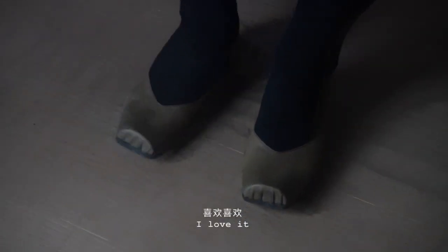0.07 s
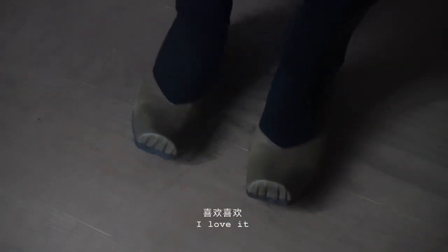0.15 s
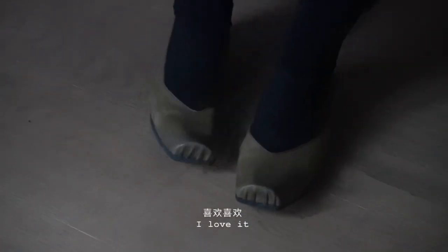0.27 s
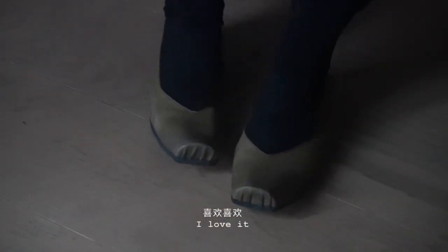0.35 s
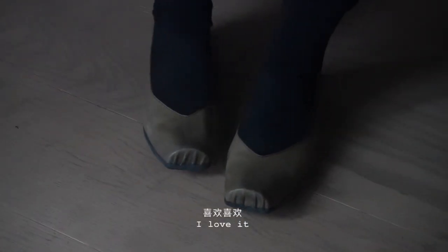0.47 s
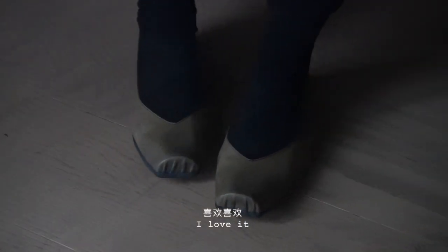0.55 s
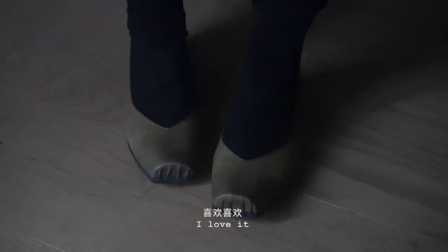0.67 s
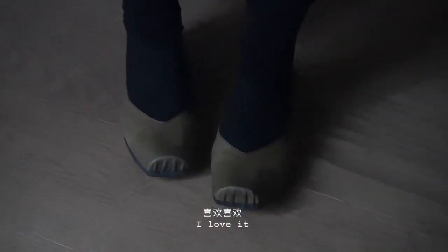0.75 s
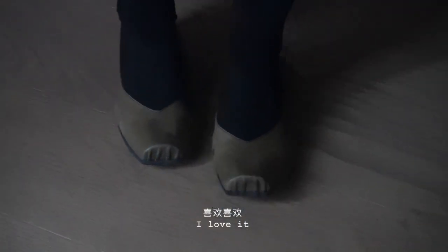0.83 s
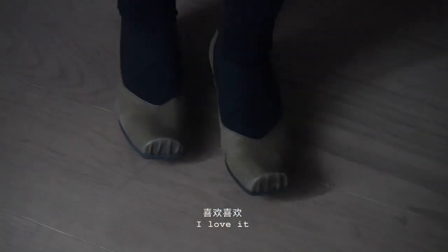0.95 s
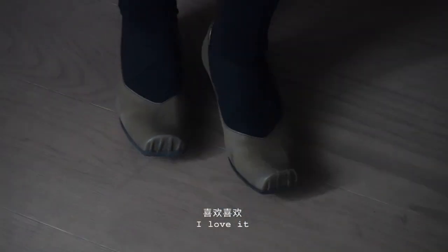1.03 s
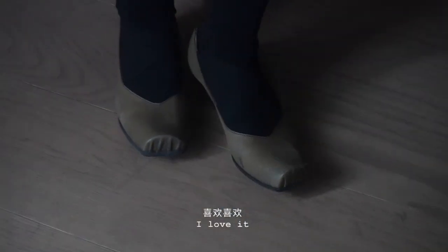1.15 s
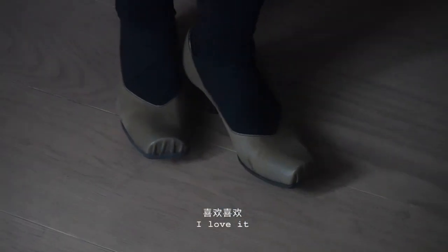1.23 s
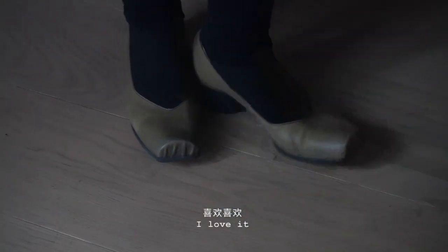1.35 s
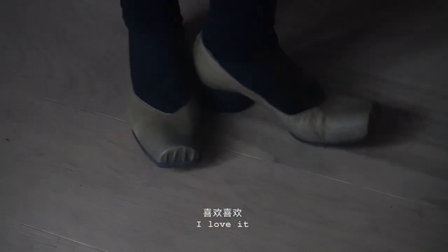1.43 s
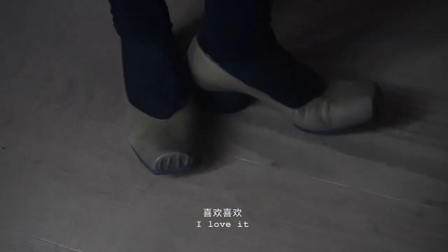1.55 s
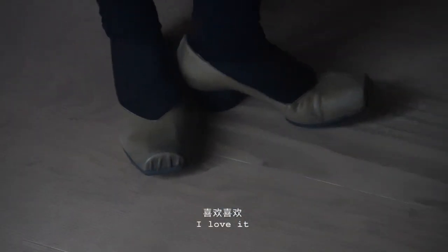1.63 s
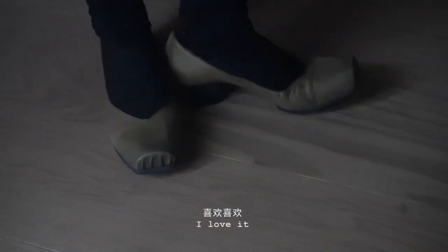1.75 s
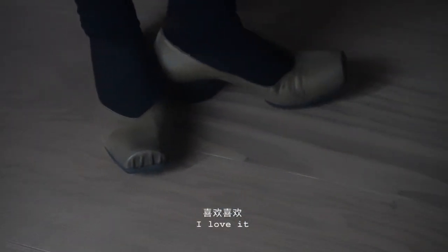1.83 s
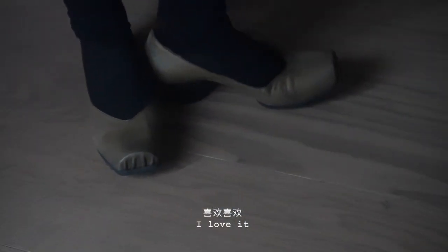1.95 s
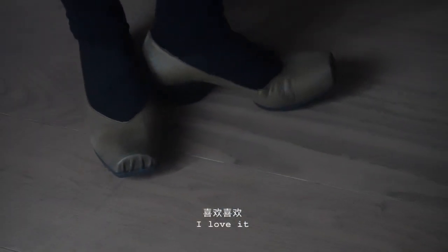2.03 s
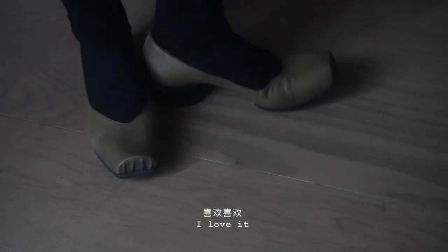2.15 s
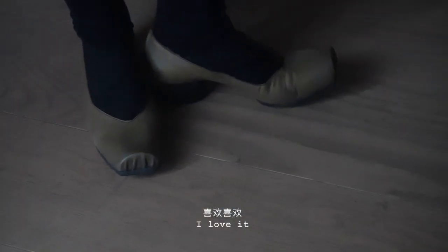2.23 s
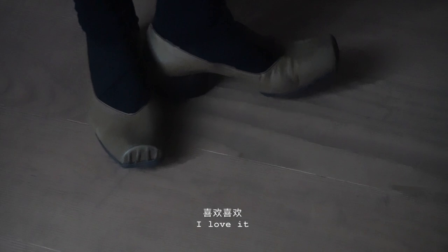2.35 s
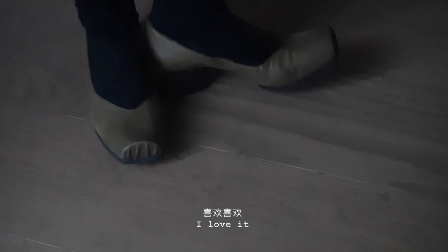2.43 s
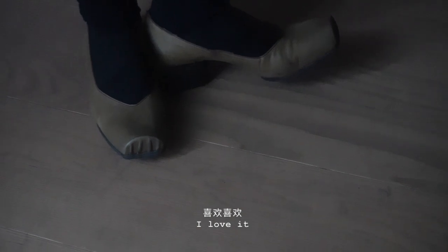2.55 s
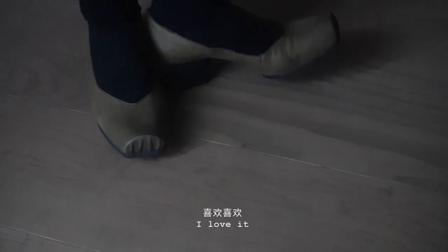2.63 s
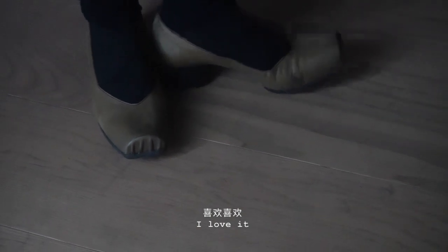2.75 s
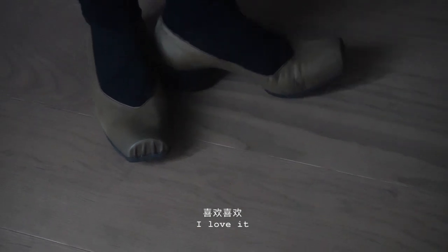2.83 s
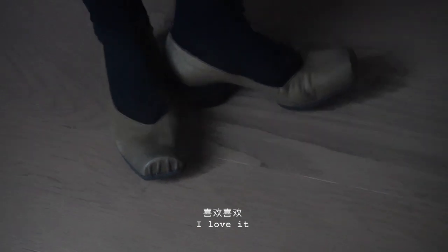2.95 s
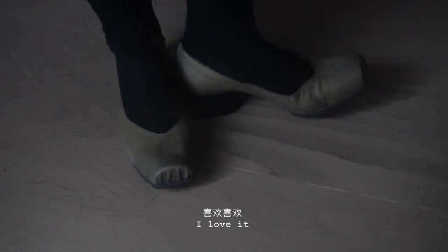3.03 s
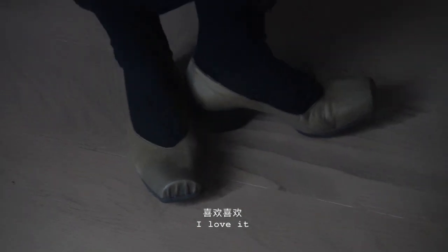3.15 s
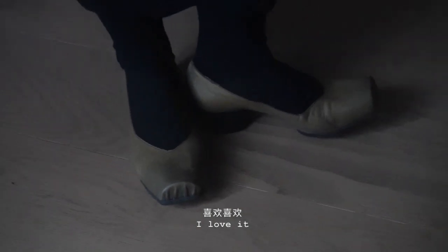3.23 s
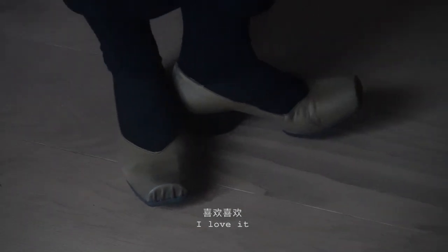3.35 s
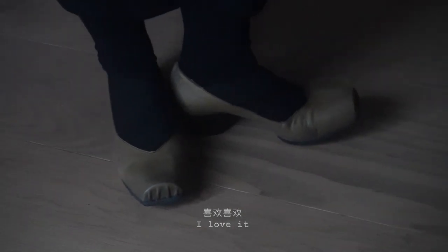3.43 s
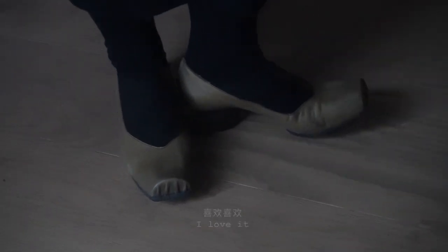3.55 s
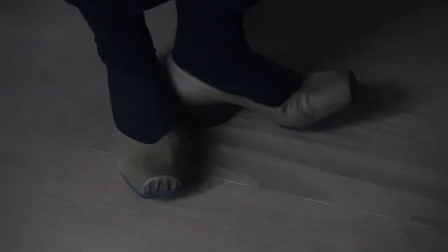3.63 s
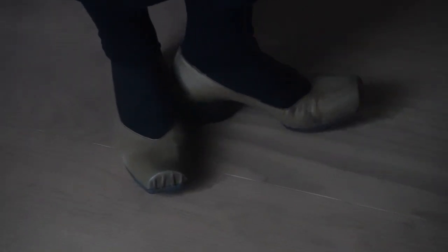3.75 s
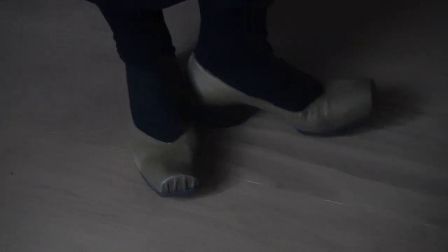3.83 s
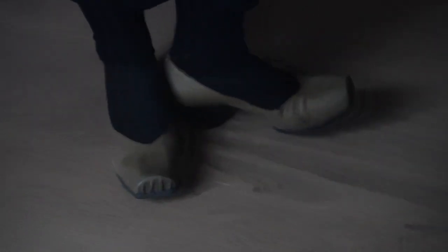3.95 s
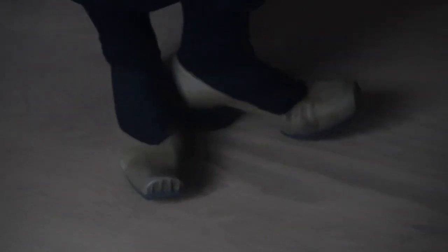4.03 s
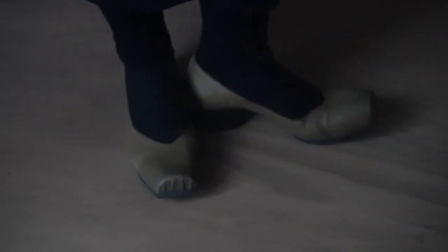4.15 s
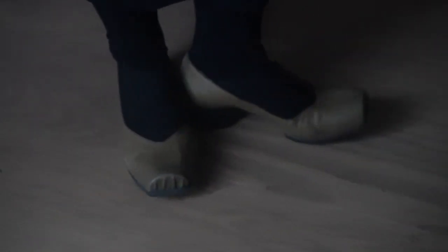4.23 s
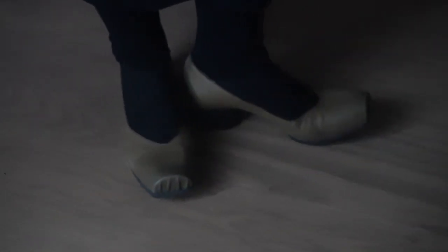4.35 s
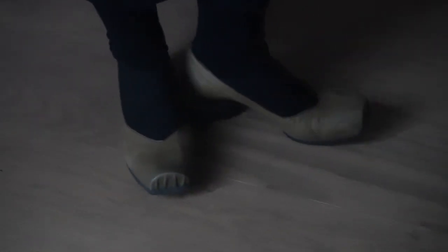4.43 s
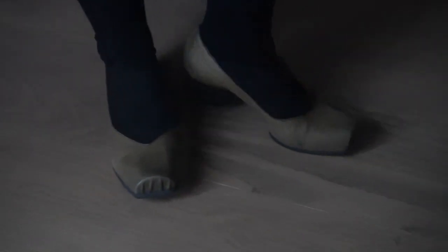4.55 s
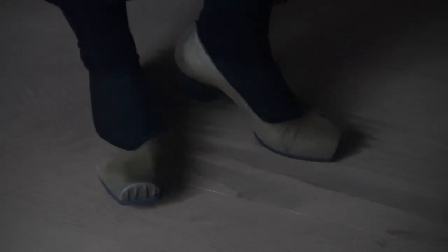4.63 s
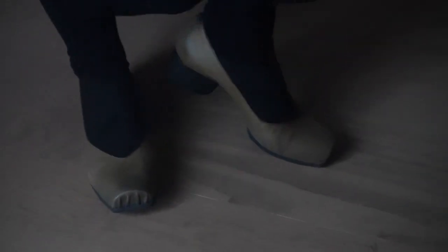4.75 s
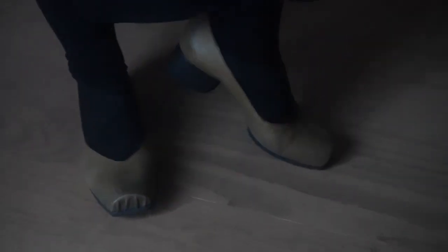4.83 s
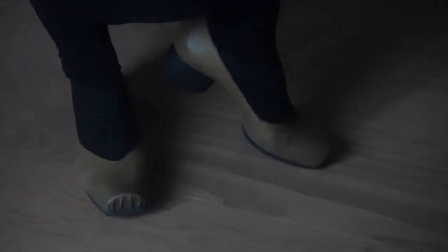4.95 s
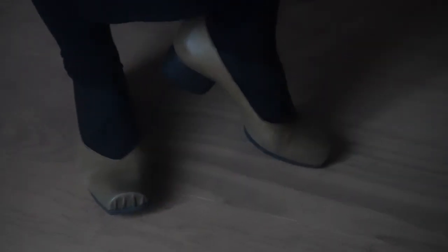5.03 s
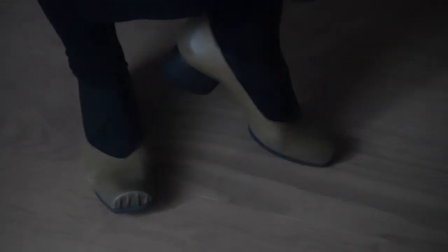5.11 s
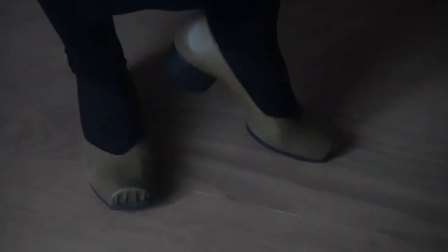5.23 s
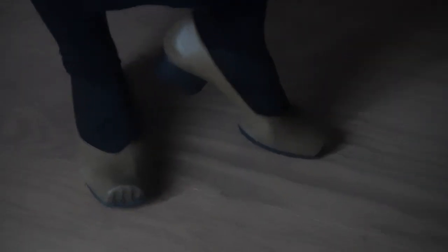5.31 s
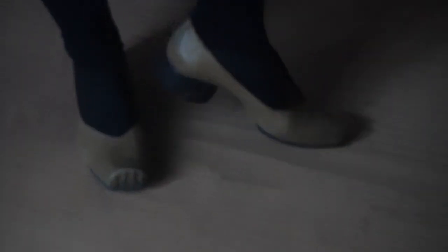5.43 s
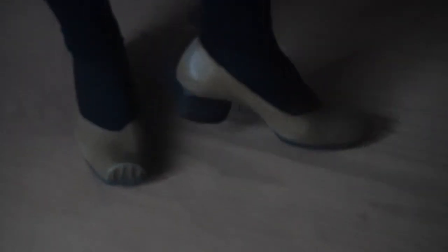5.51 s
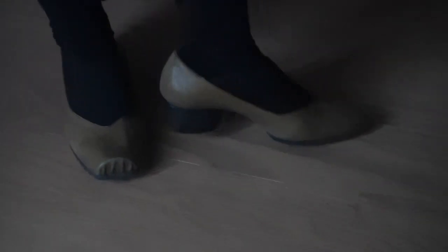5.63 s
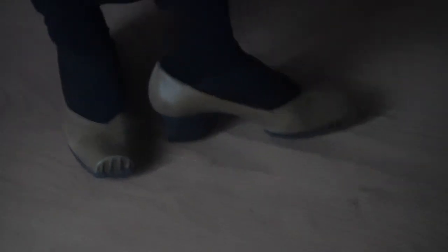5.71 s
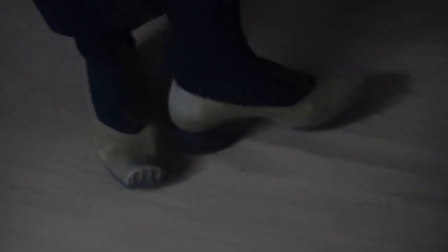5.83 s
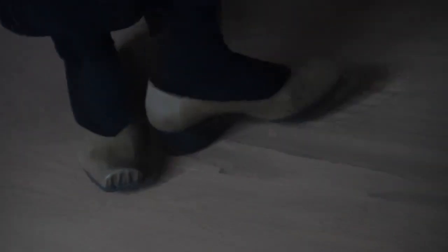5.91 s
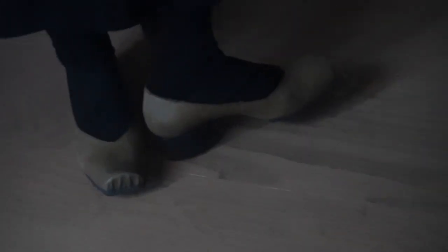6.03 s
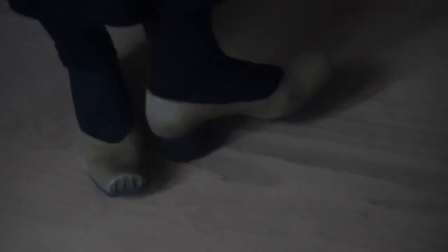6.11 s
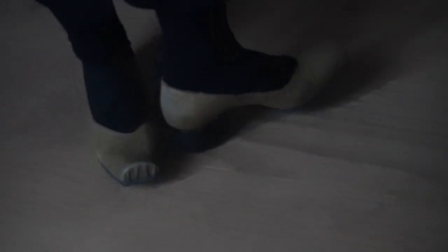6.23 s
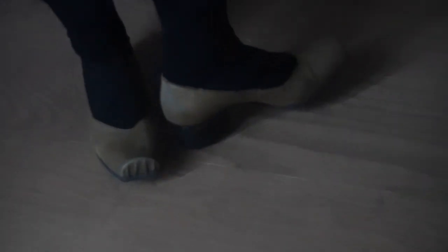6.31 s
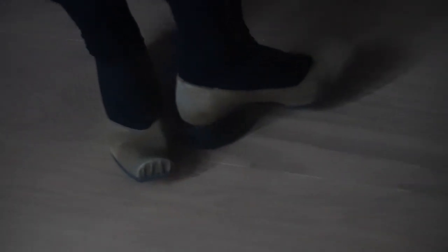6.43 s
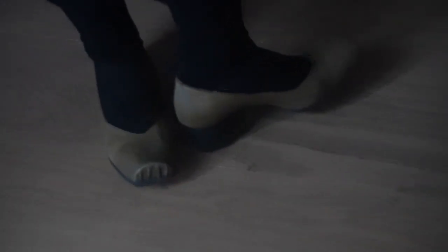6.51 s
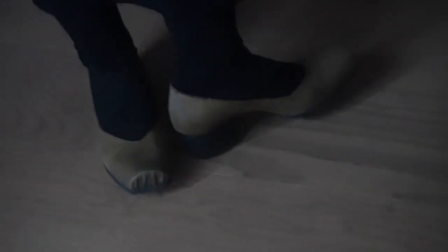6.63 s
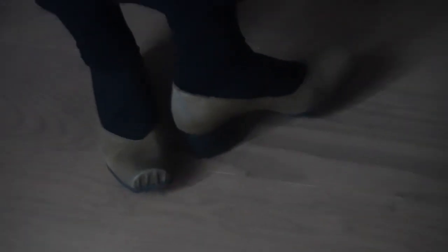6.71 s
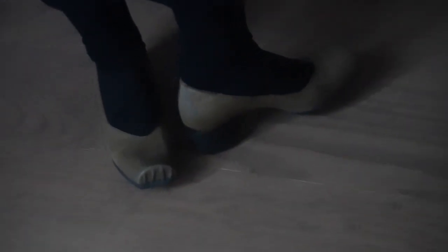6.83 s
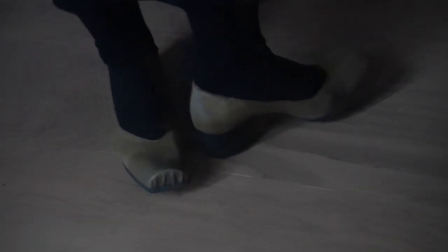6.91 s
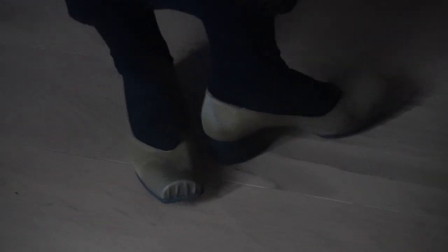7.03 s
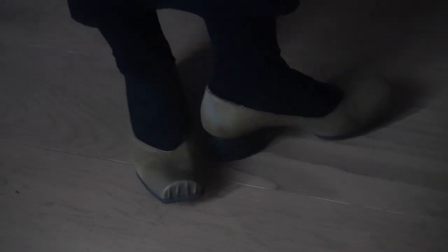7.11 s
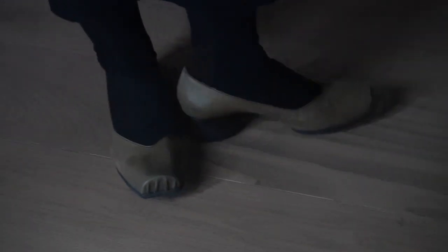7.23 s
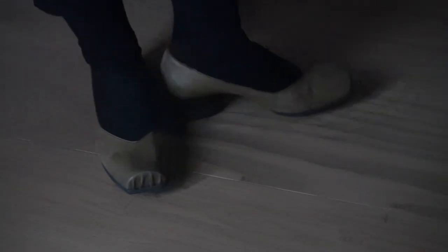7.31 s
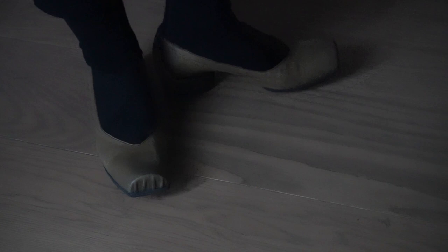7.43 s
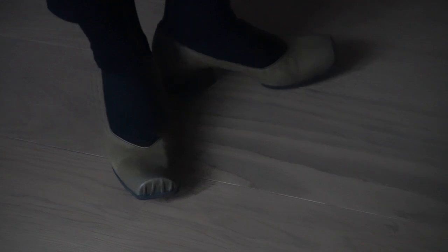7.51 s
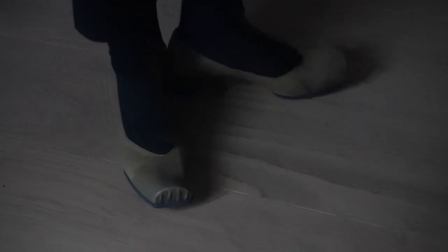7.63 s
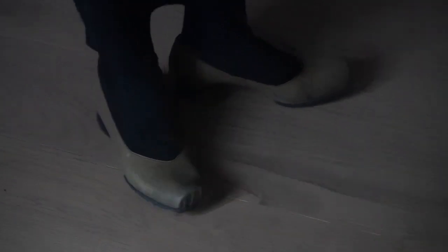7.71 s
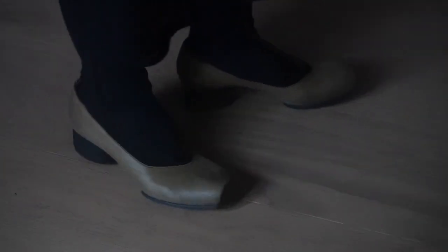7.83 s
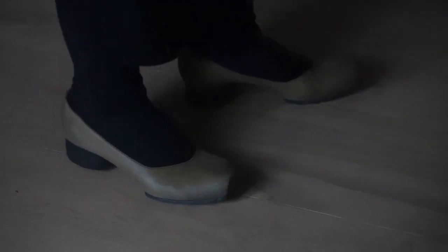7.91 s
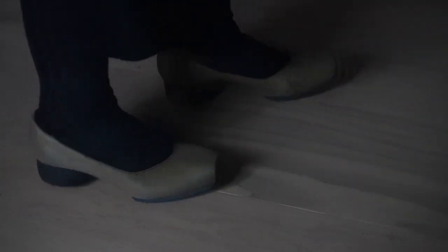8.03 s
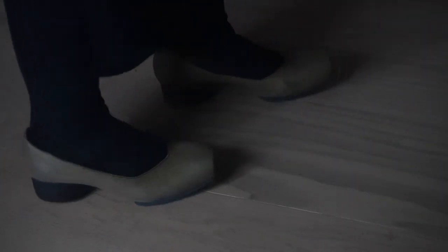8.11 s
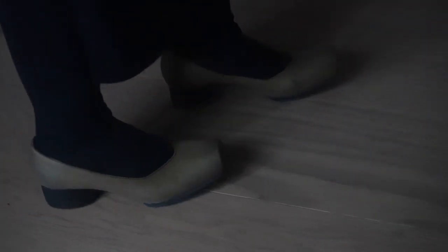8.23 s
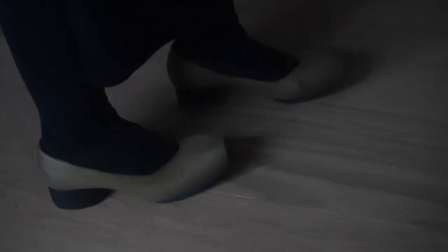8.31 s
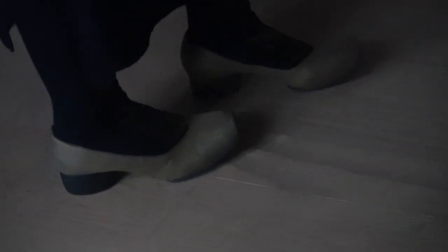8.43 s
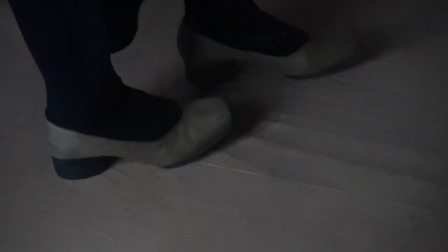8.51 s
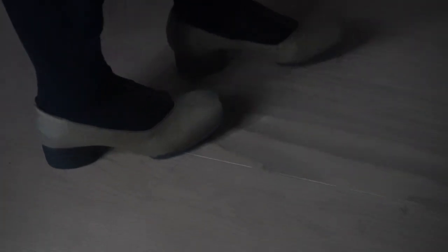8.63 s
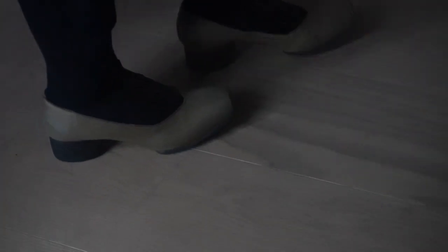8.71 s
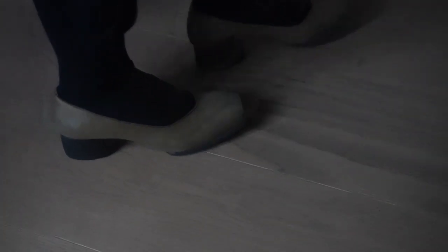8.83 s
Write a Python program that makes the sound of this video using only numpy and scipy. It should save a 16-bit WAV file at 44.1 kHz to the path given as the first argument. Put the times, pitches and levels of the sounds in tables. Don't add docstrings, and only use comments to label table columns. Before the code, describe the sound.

Low-heeled shoes scuff and squeak on a wooden floor, tap five times evenly, drop a hard heel, then scuff again and land one firm step.

```python
import sys
import numpy as np
from scipy import signal
from scipy.io import wavfile

SR = 44100
rng = np.random.default_rng(int(sys.argv[2]) if len(sys.argv) > 2 else 0)


def how_loud(loudness_db):
    steps = np.asarray(loudness_db, float) / 20
    return 10 ** steps


def waveform_to_disk(signal):
    frames = np.transpose(np.atleast_2d(signal))
    scaled = np.clip(frames, -1, 1) * 32767
    samples = np.round(scaled).astype(np.int16)
    wavfile.write(sys.argv[1], SR, samples)


N = 390726


def unit_rms(x):
    return x / np.sqrt(np.mean(x ** 2) + 1e-20)


def at_hz(points, hz, column=1):
    points = np.array(points)
    return np.interp(np.log(hz), np.log(points[:, 0]), points[:, column])


def band(x, low_hz, high_hz):
    return signal.sosfilt(signal.butter(2, [low_hz, high_hz], "band", fs=SR, output="sos"), x)


def half_octaves():
    edges = 22 * 2 ** np.arange(0, 9.6, .5)
    return zip(edges, edges[1:], np.sqrt(edges[:-1] * edges[1:]))


def drift(rate_hz):
    r = np.exp(-80 * np.pi * rate_hz / SR)
    chance = rng.standard_normal(N // 40 + 2002)
    slow = signal.lfilter([1], [1, -2 * r, r * r], chance)[2000:]
    return np.interp(np.arange(N) / 40, np.arange(len(slow)), unit_rms(slow))


def ring(force, hz, t60_s):
    r, w = how_loud(-60 / (t60_s * SR)), 2 * np.pi * hz / SR
    return signal.lfilter([0, np.sin(w)], [1, -2 * r * np.cos(w), r * r], force)


def resonate(x, peaks):
    out = 0
    for k, (hz, width_hz, db) in enumerate(peaks):
        r = np.exp(-np.pi * width_hz / SR)
        top = how_loud(db) * (-1) ** k * (1 - r * r) / 2
        out = out + signal.lfilter([top, 0, -top], [1, -2 * r * np.cos(2 * np.pi * hz / SR), r * r], x)
    return unit_rms(out)


# pitch in Hz, level in dB per Hz.
HUM = [(13, -40), (22, -70), (38, 1.5), (106, -4), (173, -11.5), (345, -16), (480, -17), (535, -19),
       (1950, -29.5), (2640, -28.5), (2870, -31.5), (6370, -35.5), (15800, -39.5)]
# pitch in Hz, likeness from 0 to 1.
HUM_LIKENESS = [(60, 1.0), (180, 0.97), (550, 0.17), (1650, 0.0), (4970, 0.094), (15000, 0.22)]


def hum(patchy_db):
    out, white = 0, rng.standard_normal((2, 2, N))
    for k, (low, high, hz) in enumerate(half_octaves()):
        mid, side = band(white[k % 2], low, high)
        alike = np.clip(at_hz(HUM_LIKENESS, hz), 0, 1)
        gain = how_loud(at_hz(HUM, hz) + patchy_db * drift(5.7))
        out = out + gain * (np.sqrt(1 + alike) * mid + np.sqrt(1 - alike) * side * [[1], [-1]])
    return how_loud(-50) * unit_rms(out)


# fastest moment in seconds, rasp level in dB, swell in seconds,
# fade in seconds, hiss in dB above the rasp.
SCUFFS = [(.045, -43, 0.25, 0.081, -8), (.19, -47, 0.022, .1, -12), (.13, -55, 0.091, .15, -5),
          (.275, -41, 0.086, 0.11, -6), (.4, -60.5, .1, .3, -1.5), (.87, -48.5, 0.15, 0.14, -9.5),
          (.99, -46, 0.18, .25, -8.5), (1.16, -43.5, 0.082, .1, -9.5), (1.44, -42, 0.07, 0.1, -10),
          (1.52, -52.5, .08, 0.22, -8), (1.79, -54, .2, 0.14, -6.5), (4.472, -46, 0.068, 0.044, -5.5),
          (7.36, -47, 0.14, 0.074, -6), (7.442, -41.5, 0.0047, 0.056, 0), (7.48, -46, 0.048, 0.16, -5),
          (7.71, -45.5, 0.066, 0.073, -8), (7.754, -38.5, 0.046, 0.023, -8), (7.79, -54.5, 0.046, 0.25, -1)]
SKIMS = [
    (4.65, -67.5, 0.22, 0.37, 6.5),
    (4.9, -79.5, .3, .2, 15),
    (5.47, -49, 0.073, .1, -2.5),
    (5.52, -46.5, .1, 0.091, -6.5),
    (5.64, -64, 0.084, 0.6, -2.5),
    (8.0, -61.5, 0.24, 0.37, -0.5),
    (8.4, -56, 0.11, 0.12, -2),
]
SWIPES = [
    (1.25, -47, 0.15, 0.037, -6.5),
    (1.34, -44, .035, .1, -10.5),
    (1.39, -42.5, 0.16, 0.18, -11),
    (5.795, -44, 0.016, 0.11, -12.5),
    (7.0, -48.5, 0.013, 0.13, -14),
    (7.05, -57, 0.08, 0.11, 3.5),
    (7.18, -49.5, .08, .1, 1),
    (7.25, -47.5, 0.14, .13, 2),
]
SHIFTS = [(2.83, -63.5, .02, 0.44, -8), (3.77, -58.5, 0.43, 0.03, -23), (3.47, -64, .02, 0.18, -24),
          (3.81, -54.5, .02, 0.29, -28), (5.38, -65.5, .08, 0.053, -16), (5.93, -64.5, 0.11, .3, -4),
          (6.17, -60, 0.33, 0.12, -18), (8.17, -59, 0.19, 0.076, -17), (8.24, -44.5, 0.064, .13, -29),
          (8.33, -51, 0.091, 0.37, -10), (8.59, -70, 0.033, .04, -15)]
# rasp brightness in dB, air in dB above the hiss,
# rumble in dB above the rasp.
COLOURS = [
    (-0.2, -2, -2.5),
    (3.5, -.5, -6.5),
    (-0.5, 2, -3.5),
    (-4, -6, 4.5),
]
# pitch in Hz, width in Hz, level in dB.
RASP_LOW = [(1062, 78, -4.5), (1626, 410, 0.5), (1752, 123, 4.5), (1992, 270, -0.5)]
RASP_HIGH = [(2380, 830, 5.5), (3190, 810, 6), (3870, 1650, -1.5)]
RUMBLE = [(348, 48, -2), (515, 83, -2), (786, 340, -5.5)]
# pitch in Hz, width in Hz, level in dB.
HISS = [(4100, 2740, -1.5), (6300, 2100, 3.5), (7560, 1400, 3.5), (9060, 1670, 2)]
AIR = [(11500, 2800, 1.6), (14900, 1340, 0.86)]


def drags():
    span_db, rounding = 20, 1.61
    t, power = np.arange(N) / SR, np.zeros((5, N))
    for strokes, (bright_db, air_db, rumble_db) in zip([SCUFFS, SKIMS, SWIPES, SHIFTS], COLOURS):
        for s, rasp_db, swell_s, fade_s, hiss_db in strokes:
            swell_s, fade_s = max(swell_s, .004), max(fade_s, .004)
            now = (t > s - 2 * swell_s) & (t < s + 2 * fade_s)
            away = np.maximum((s - t[now]) / swell_s, (t[now] - s) / fade_s)
            speed_db = -span_db * away ** rounding
            layers_db = np.array([-bright_db / 2, bright_db / 2, rumble_db, hiss_db, hiss_db + air_db])
            power[:, now] += how_loud(rasp_db + layers_db[:, None] + speed_db) ** 2
    level = np.sqrt(power)
    slips_per_s = np.array([[5000], [20000]])
    sizes = how_loud(2.46 * np.minimum(rng.exponential(1, (2, N)), 5)) * rng.choice([-1, 1], (2, N))
    slips = sizes * (rng.random((2, N)) < slips_per_s / SR) * how_loud(1.33 * drift(30))
    bodies = [RASP_LOW, RASP_HIGH, RUMBLE]
    shaken = sum(gain * resonate(slips[0], body) for gain, body in zip(level, bodies))
    direct = level[3] * resonate(slips[1], HISS) + level[4] * resonate(slips[1], AIR)
    return (how_loud(-4) * shaken + how_loud(-0.5) * direct) * how_loud([[-.6], [.6]])


# start in seconds, length in seconds, pitch in Hz,
# width in Hz, level in dB.
SQUEAKS = [(.02, 0.052, 6900, 180, -49), (.22, 0.12, 3520, 280, -44), (.24, 0.16, 2100, 200, -58),
           (1, 0.13, 1120, 70, -52), (1.3, 0.18, 3210, 280, -43), (1.36, 0.15, 1760, 110, -44),
           (1.44, 0.037, 495, 28, -37), (4.42, 0.074, 1440, 300, -45.5), (6.07, 0.17, 2350, 100, -64.5),
           (5.43, 0.13, 3600, 600, -52), (1, .08, 1840, 490, -47.5), (6, 0.046, 350, 56, -48.5),
           (8.1, 0.066, 320, 51, -45), (7.21, .11, 1750, 100, -49), (7.2, 0.14, 4300, 120, -55),
           (7.29, .11, 2720, 360, -46), (7.15, 0.17, 5300, 110, -60), (7.44, .05, 1700, 290, -44),
           (8.112, .1, 2350, 90, -61), (8.107, 0.076, 2600, 70, -60), (6.996, .1, 8500, 150, -61)]


def squeaks():
    out = np.zeros(N)
    for s, length_s, hz, width_hz, db in SQUEAKS:
        count = round(length_s * SR)
        tone = resonate(rng.standard_normal(SR // 2), [(hz, width_hz, 0)])[-count:]
        out[round(s * SR):][:count] += how_loud(db) * tone * np.hanning(count)
    return out


# pitch in Hz, time to die away (60 dB) in seconds,
# then level in dB under the toe, under the heel and under the whole sole.
BOARDS = [(237, 0.063, 1.5, 0.5, -14), (335, 0.11, -4, -2.5, -12.5), (377.5, 0.16, -8.5, -15, -9),
          (452, 0.029, -1.5, -1, -20), (458, 0.015, 6.5, 4.5, 8), (518, 0.077, -5.5, -9, -8.5),
          (644, 0.057, -19, -9, -1.5), (733.5, 0.05, -3.5, -27, 3.5), (784, 0.048, 0.5, -32, -5),
          (946, 0.042, -3, -15.5, -20), (1142, 0.044, -7, -14, -15), (1407, 0.031, -7, -17, -18),
          (1557, 0.019, -2.5, -24, -9.5), (1712, 0.011, 6, -1.5, -6), (2020, 0.0043, 3.5, -33, -28),
          (2214, 0.01, 0.5, -27, -7), (2540, 0.0044, -21, -41, -7), (2830, 0.0054, -6, -38, -19),
          (3680, 0.0068, -15, -34, -34), (3920, 0.0056, -18, -33, -36)]


def knocks(table, joist_hz, heavy_db, contact_hz, column):
    far_ring_share = 0.44
    out, t = np.zeros((2, N + SR)), np.arange(SR // 2) / SR
    spread_db = rng.normal(0, 1.5, (len(table), len(BOARDS)))
    grit = rng.standard_normal((len(table), len(t)))
    push = signal.sosfilt(signal.butter(2, contact_hz, fs=SR, output="sos"), t == 0)
    strength = [how_loud(m[column]) * (-1) ** max(k - 5, 0) for k, m in enumerate(BOARDS)]
    modes = np.array([[ring(push, m[0], m[1] * share) / np.sqrt(share) for m in BOARDS]
                      for share in (1, far_ring_share)])
    octaves = np.log2(np.array(BOARDS)[:, 0] / 605)
    small_boards = signal.butter(4, 307, "high", fs=SR, output="sos")
    thump = ring(push, joist_hz, 0.097) * (1 - np.exp(-t / 0.0012))
    for k, (s, db, hard_db, crack_db, thump_db) in enumerate(table):
        tilt_db = hard_db * np.maximum(octaves, 0) - heavy_db * np.minimum(octaves, 0)
        wood = signal.sosfilt(small_boards, (how_loud(tilt_db + spread_db[k]) * strength) @ modes)
        wood = wood / np.abs(wood[0]).max()
        crack = how_loud(crack_db + 11) * band(grit[k] * np.exp(-t / 0.00086), 2600, 10300)
        i = round((s + .0028) * SR)
        out[:, i:i + len(t)] += how_loud(db + 1.0) * (wood + how_loud(thump_db) * thump + crack)
    return out[:, :N]


# time in seconds, peak in dB, hardness in dB per octave, crack in dB,
# joist thump in dB.
STEPS = [
    (.186, -21, -13, -38, -15.5),
    (7.549, -27, 4.5, -33, -10.5),
    (8.204, -9, 2.6, -35.5, -25),
]


def steps():
    return knocks(STEPS, 111, heavy_db=3.5, contact_hz=1700, column=4)


# time in seconds, peak in dB, hardness in dB per octave, crack in dB,
# joist thump in dB.
TOE_TAPS = [
    (2.806, -18, -1, -33, -10),
    (3.126, -11, 0, -39.5, -14),
    (3.450, -11, 0.5, -45, -15),
    (3.786, -9, 2.5, -47, -15.5),
    (4.112, -10, 1.7, -38, -15),
    (6.990, -18, -1, -32, -16.5),
]


def toe_taps():
    return knocks(TOE_TAPS, 88, heavy_db=-1.5, contact_hz=1860, column=2)


# time in seconds, peak in dB, hardness in dB per octave, crack in dB,
# joist thump in dB.
HEEL_DROPS = [
    (5.778, -8, 6.6, -20, -18.5),
    (7.439, -42.5, 8, -7, -15),
]


def heel_drops():
    return knocks(HEEL_DROPS, 109, heavy_db=4, contact_hz=660, column=3)


# pitch in Hz, time to die away (60 dB) in seconds, level in dB,
# share that differs left to right in dB.
ROOM = [(90, 0.83, -6, -42), (196, 0.55, 1.5, -27), (413, 0.36, -1, -18), (990, 0.5, 2, -9),
        (2410, 0.39, 3, -2), (5070, 0.26, 1, 3.5), (12300, 0.17, -1, 3)]


def room(x):
    first_echo_s = 0.0014
    t = np.arange(SR * 3 // 5) / SR
    white, tail = rng.standard_normal((2, 2, len(t))), 0
    for k, (low, high, hz) in enumerate(half_octaves()):
        mid, side = band(white[k % 2], low, high)
        t60_s = np.maximum(at_hz(ROOM, hz), .05)
        fall = how_loud(at_hz(ROOM, hz, column=2) - 60 * t / t60_s)
        tail = tail + fall * (mid + how_loud(at_hz(ROOM, hz, column=3)) * side * [[1], [-1]])
    tail = tail * np.clip(t / first_echo_s - .5, 0, 1) * how_loud(-3) / np.sqrt(0.028 * SR)
    return signal.fftconvolve(x.mean(axis=0, keepdims=True), tail, axes=1)[:, :N]


SEND_DB = [-0.35, -3, 3.2]


def scene():
    background = hum(patchy_db=0.35)
    slide, place = drags() + squeaks(), 2.77 * drift(2.53)
    blows = [toe_taps(), heel_drops(), steps()]
    echoes = room(slide * np.cos(place)) + room(slide * np.sin(place))
    for send_db, (near, far) in zip(SEND_DB, blows):
        echoes = echoes + room(how_loud(send_db) * far[None])
    return sum(near for near, far in blows) + slide + echoes + background


def low_pass(x):
    return signal.sosfilt(signal.butter(12, 16640, fs=SR, output="sos"), x)


def record(dry):
    bass_cut = signal.sosfilt(signal.butter(2, 36, "high", fs=SR, output="sos"), dry)
    top_cut = signal.sosfilt(signal.cheby2(16, 45, 16150, fs=SR, output="sos"), bass_cut)
    return low_pass(top_cut)


dry = scene()
out = record(dry)
waveform_to_disk(out)
```